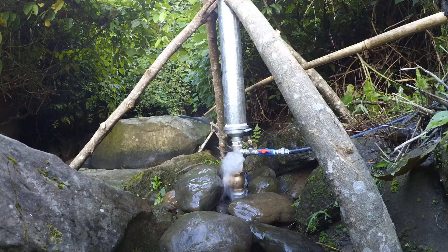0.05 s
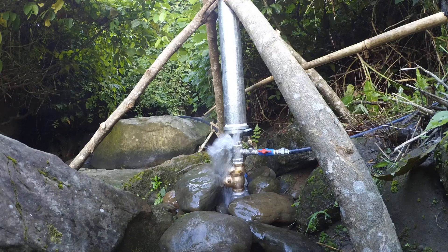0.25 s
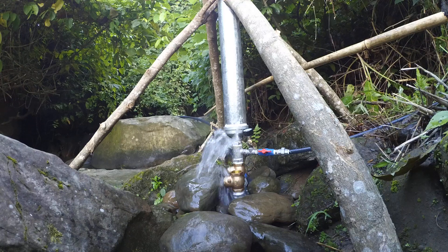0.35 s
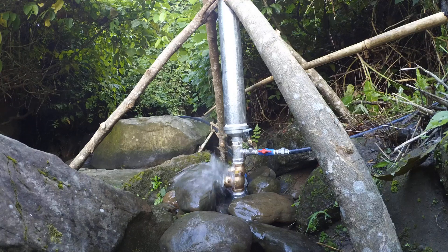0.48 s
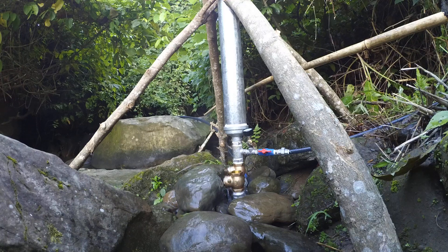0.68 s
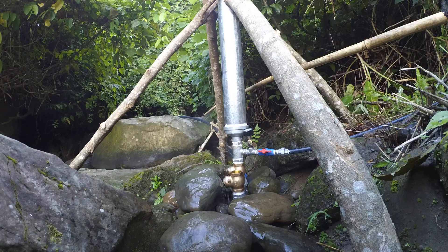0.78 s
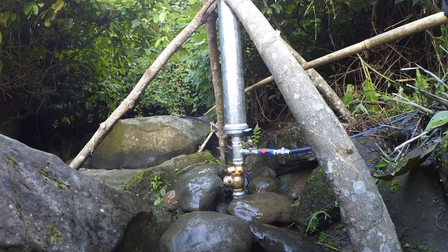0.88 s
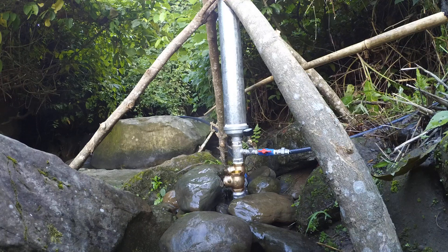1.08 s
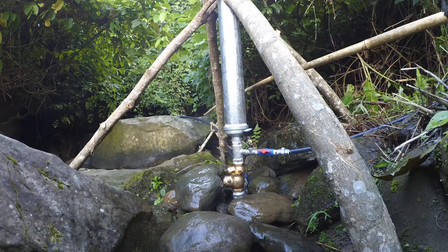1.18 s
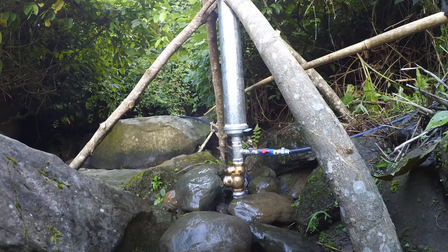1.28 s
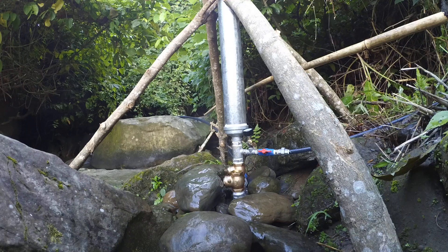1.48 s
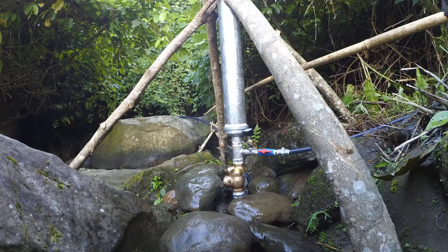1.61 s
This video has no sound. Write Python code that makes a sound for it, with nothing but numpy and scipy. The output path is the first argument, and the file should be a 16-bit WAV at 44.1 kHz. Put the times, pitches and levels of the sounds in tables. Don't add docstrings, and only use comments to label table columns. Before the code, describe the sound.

A brass pump valve slams shut with sharp metallic clacks beside splashing water and a stream

```python
import sys
import numpy as np
from scipy import signal
from scipy.fft import rfft, irfft
from scipy.io import wavfile
from scipy.ndimage import uniform_filter1d

SR = 44100
rng = np.random.default_rng(int(sys.argv[2]) if len(sys.argv) > 2 else 0)


def to_linear_factor(level_db):
    exponent = np.asarray(level_db, float) / 20
    return 10 ** exponent


def dump_mix(stems):
    frames = np.atleast_2d(stems).T
    limited = np.clip(frames, -1, 1)
    pcm = np.round(limited * 32767).astype(np.int16)
    wavfile.write(sys.argv[1], SR, pcm)


N = 72765


def evened(x):
    return x / np.sqrt(np.mean(x ** 2) + 1e-20)


def add(mix, start_s, sound):
    part = mix[max(round(start_s * SR), 0):][:len(sound)]
    part += sound[:len(part)]


def hiss(colour, patchy_db, flicker_db):
    frames = N // 128 + 5
    real, imag, patches = rng.standard_normal((frames, 257, 3)).T
    patches = uniform_filter1d(patches, size=6, axis=0)
    patches = evened(uniform_filter1d(patches, size=14, axis=1))
    flicker = evened(uniform_filter1d(rng.standard_normal(frames), size=3))
    spectrum = (real + 1j * imag) * to_linear_factor(patchy_db * patches + flicker_db * flicker)
    noise = signal.istft(spectrum, nperseg=512, noverlap=384)[1][:N]
    colour_hz, colour_db = np.transpose(colour)
    hz = np.fft.rfftfreq(N, 1 / SR)
    gain_db = np.interp(np.log(hz + 1), np.log(colour_hz + 1), colour_db)
    return evened(irfft(rfft(noise) * to_linear_factor(gain_db), N))


SLAM_MODES = [(1645, -7, .02), (2054, -4, 0.026), (2600, -8, 0.031), (2817, 1.5, 0.024), (3130, -7, .03),
              (3247, -8, 0.085), (3670, -3, 0.07), (3848, -4.5, 0.071), (4382, 0.5, 0.05), (4500, -9, .05),
              (4620, -13, 0.054), (5827, -13, .035), (8200, -8, 0.019), (9730, -21, .03)]
THUD_MODES = [(184, -9.5, 0.086), (342, -7, 0.054), (508, 4.5, 0.022), (665, 5, 0.019), (837, -5, .04),
              (940, -15.5, 0.043), (1095, -7, 0.064), (1300, -8, 0.018)]
KNOCK_MODES = [(360, -0.5, 0.047), (457, 3.5, 0.039), (673, -8.5, 0.034), (843, 1, 0.037), (1151, 4, 0.036),
               (1320, -7.5, 0.041), (1370, -3, 0.052), (3130, -17, .04), (3320, -17, .03),
               (4360, -10.5, 0.035), (4690, -11, 0.043)]
CLACK_MODES = [(2450, -22, 0.036), (2820, -2, 0.033), (3250, -11, 0.036), (3670, -8, 0.06),
               (3967, -1.5, 0.032), (4480, -7, 0.041), (5093, -15, 0.065), (7960, -3.5, 0.04)]
SETTLE_MODES = [(716, -5, 0.034), (1125, -8, 0.051), (1434, -1, 0.019), (1705, 1, 0.012), (2730, -20, .06),
                (3830, -17, .07), (3940, -6.5, 0.13), (4560, -20, 0.05), (7612, -9, 0.073),
                (10430, -12.5, 0.054), (10460, -3.5, 0.039)]
BOUNCE_MODES = [(420, -1.5, 0.09), (1653, 3, 0.02), (2680, -3, .02), (2850, 4.5, 0.025), (3310, -15, 0.03),
                (3900, -4, 0.093), (4030, 1, 0.024), (4120, -13, .02), (5640, -21, .03)]
ROCKING_MODES = [(415, -9, .06), (1196, 2, .028), (1630, -2, 0.021), (3750, -13, .05)]
SLAM_CONTACTS = [
    (.2280, -27, 4.5),
    (0.2290, -23.5, 0),
    (.2305, -30, 1),
    (0.233, -40, 2),
    (.2400, -39, 8),
]
THUD_CONTACTS = [
    (0.2294, -20.5, 2),
    (0.2326, -19.5, 0.092),
    (0.2393, -44, 3),
]
KNOCK_CONTACTS = [
    (0.5716, -37, 7.5),
    (0.5724, -29, 0.5),
    (0.579, -36, -0.5),
]
CLACK_CONTACTS = [
    (.9013, -27, .1),
    (.9035, -36.5, .1),
    (.906, -41, -.6),
]
SETTLE_CONTACTS = [
    (0.907, -32, -4),
    (0.9090, -33, 2.6),
    (.913, -41.5, -5),
    (.925, -41.5, 0),
]
BOUNCE_CONTACTS = [
    (0.979, -45, 0.5),
    (0.9802, -37.5, .5),
    (0.9853, -51.5, .2),
]
ROCKING_CONTACTS = [
    (0.9863, -36.5, .1),
    (.990, -46, .1),
]


def ringing_blows():
    out = np.zeros(N)
    t = np.arange(SR // 5) / SR
    onset = np.minimum(t / 0.00089, 1)
    blows = ((SLAM_MODES, SLAM_CONTACTS), (THUD_MODES, THUD_CONTACTS), (KNOCK_MODES, KNOCK_CONTACTS),
             (CLACK_MODES, CLACK_CONTACTS), (SETTLE_MODES, SETTLE_CONTACTS),
             (BOUNCE_MODES, BOUNCE_CONTACTS), (ROCKING_MODES, ROCKING_CONTACTS))
    for modes, contacts in blows:
        for (start_s, blow_db, tilt_db), luck in zip(contacts, rng.random((5, 14, 2))):
            ring = np.zeros(len(t))
            for (hz, db, t60), (detune, phase) in zip(modes, luck):
                struck_hz = hz * (1 + 0.0046 * (detune - 0.5))
                level = to_linear_factor(db + tilt_db * np.log2(hz / 2000) - 60 * t / t60)
                ring += level * np.sin(2 * np.pi * struck_hz * t + 0.45 * phase)
            add(out, start_s, 2 * to_linear_factor(blow_db) * onset * ring)
    return out


CRACK_TIMES = [
    (0.226, -17.5, 0.0055, 0.025),
    (0.5677, -35, 0.013, 0.042),
    (0.9016, -25.5, 0.011, 0.018),
    (0.973, -42, 0.012, .04),
]
WET_CRACK = [(250, -16), (600, -14), (1460, -8), (2820, -1.5), (8570, -7), (12500, -15), (14800, -22),
             (16000, -44)]
DRAINED_CRACK = [(290, -26), (600, -8), (1500, -2.5), (2290, -11.5), (3860, -4), (6420, -13),
                 (10700, -16.5), (16000, -27)]


def cracks():
    out = np.zeros(N)
    t = np.arange(SR // 5) / SR
    tail_db, tail_t60 = -12.5, 0.22
    wet = hiss(WET_CRACK, patchy_db=2.0, flicker_db=-0.87)
    drained = hiss(DRAINED_CRACK, patchy_db=2.0, flicker_db=-0.87)
    for (start_s, db, hold, t60), noise in zip(CRACK_TIMES, (wet, wet, drained, drained)):
        burst = to_linear_factor(db - 60 * np.maximum(t - hold, 0) / t60)
        tail = to_linear_factor(db + tail_db - 60 * t / tail_t60)
        shape = np.minimum(t / 0.0031, 1) * (burst + tail)
        add(out, start_s, shape * noise[round(start_s * SR):][:len(t)])
    return out


def off_the_rocks(sound):
    rocks_db, rocks_t60 = -15.5, 0.17
    t = np.arange(SR // 5) / SR
    taps = rng.standard_normal(len(t)) * to_linear_factor(-60 * t / rocks_t60)
    taps *= (rng.random(len(t)) < 0.05) * (t > 0.003)  # sparse, none nearer than 3 ms
    taps = signal.lfilter([1], [1, -0.4], taps)
    return to_linear_factor(rocks_db) * signal.fftconvolve(sound, taps / np.linalg.norm(taps))[:N]


def valve():
    near = cracks() + ringing_blows()
    low_cut = signal.butter(2, 67, "high", fs=SR, output="sos")
    return signal.sosfilt(low_cut, near + off_the_rocks(near))


SPLASHES = [(.03, .012, -48.5, 1460), (.084, 0.0064, -46.5, 3980), (.097, 0.0054, -39.5, 2370),
            (0.124, 0.013, -54, 1030), (.172, 0.0061, -64, 3500), (.198, 0.0064, -45, 3930),
            (.263, 0.0082, -44, 2760), (0.293, 0.0082, -43, 1740), (.32, 0.01, -46, 3200),
            (.15, 0.033, -52, 372), (0.339, 0.011, -39, 1440), (.384, 0.0082, -45, 1430),
            (.425, 0.007, -52, 3040), (0.444, 0.0083, -46.5, 3030), (.475, .006, -51, 3040),
            (0.499, 0.0036, -53, 6000), (0.518, 0.004, -40.5, 1510), (.548, .003, -35, 1300),
            (.555, 0.0022, -32.5, 3030), (.560, 0.0016, -39.5, 1880), (0.566, 0.003, -44, 3000),
            (0.541, 0.0033, -42, 2460), (0.599, 0.0097, -45, 2570), (.622, 0.0031, -46, 6960),
            (0.637, 0.0056, -45.5, 3000), (.648, 0.0098, -47.5, 2550), (0.671, 0.003, -45, 1770),
            (.695, 0.0054, -47, 4830), (1.607, 0.0066, -67, 9000)]
TRICKLE = [(0, -44.5), (.3, -46), (.5, -49.5), (.7, -49.5), (.85, -49.5), (1.0, -50.5), (1.2, -50),
           (1.65, -53.5)]
SPRAY_COLOUR = [(470, -31), (800, -5.5), (1760, -1), (2320, -7.5), (9810, -14.5), (15200, -28),
                (16000, -40)]


def splashes():
    drops, octaves, drop_turns, tilt_db = 60, 2.12, 4, 1.5
    fizz_share = 0.56
    out = np.zeros(N)
    t = np.arange(N) / SR
    spray = hiss(SPRAY_COLOUR, patchy_db=0.5, flicker_db=1.5)
    spray_power = to_linear_factor(2 * np.interp(t, *np.transpose(TRICKLE)))
    for peak_s, spread, db, low_hz in SPLASHES:
        luck = rng.random((drops, 4))
        u = np.arange(round(4 * spread * SR) + 400)[:, None] / SR
        pitch_range = min(2 ** octaves, SR / 3 / low_hz)
        hz = low_hz * pitch_range ** (luck[:, 0] ** 1.61)
        drop_s = 2 * spread * (luck[:, 1] + luck[:, 2])
        turns = np.maximum(u - drop_s, 0) * hz
        size = to_linear_factor(tilt_db * np.log2(hz / low_hz) - 3.3 * np.log(luck[:, 3] + 0.02))
        age = turns / drop_turns
        tone = np.sin(2 * np.pi * turns * (1 + 0.021 * turns))
        clump = (size * age * np.exp(-3 * age) * tone).sum(1)
        add(out, peak_s - 2 * spread, to_linear_factor(db) * np.sqrt(1 - fizz_share) * evened(clump))
        spray_power += fizz_share * to_linear_factor(2 * db) * np.exp(-((t - peak_s) / spread) ** 2)
    return out + spray * np.sqrt(spray_power)


def hum(hz, width, db, throb_db):
    r = np.exp(-np.pi * width / SR)
    noise = rng.standard_normal(N) + 1j * rng.standard_normal(N)
    slow = signal.lfilter([1], [1, -2 * r, r * r], noise)
    throb = uniform_filter1d(rng.standard_normal(N), size=900)
    throb = evened(uniform_filter1d(throb, size=900))
    tone = (slow * np.exp(2j * np.pi * hz * np.arange(N) / SR)).real
    return to_linear_factor(db) * evened(to_linear_factor(throb_db * throb) * tone)


WASH = [(12, -59), (20, -15.5), (123, -19), (163, -1), (574, -25.5), (976, -25), (4810, -25),
        (14300, -44.5), (16000, -42)]
HOLLOWS = [(170, 69, -53.5), (235.1, 116, -53.5), (457.2, 136, -56), (1001, 185, -57), (1570, 68, -65)]


def stream():
    wash = to_linear_factor(-44.5) * hiss(WASH, patchy_db=3.0, flicker_db=-0.17)
    return wash + sum(hum(*row, throb_db=-0.8) for row in HOLLOWS)


INSECTS = [(4800, 55, -62), (5450, 51, -65), (6540, 340, -68)]


def insects():
    return sum(hum(*row, throb_db=5.5) for row in INSECTS)


def scene():
    mid = stream() + insects() + valve() + splashes()
    low_noise, soft_noise = rng.standard_normal((2, N))
    low_pass = signal.butter(3, 70, fs=SR, output="sos")
    side = to_linear_factor(-78) * evened(signal.sosfilt(low_pass, low_noise))
    side += to_linear_factor(-86) * evened(signal.lfilter([1], [1, -0.95], soft_noise))
    return np.array([mid + side, mid - side])


def roll_off(x):
    return signal.sosfilt(signal.butter(12, 16470, fs=SR, output="sos"), x)


def record(dry):
    band_limit = signal.firwin(255, 15330, window=("kaiser", 0.8), fs=SR)
    limited = signal.oaconvolve(dry, band_limit[None], "same")
    return roll_off(limited)


dry = scene()
out = record(dry)
dump_mix(out)
```